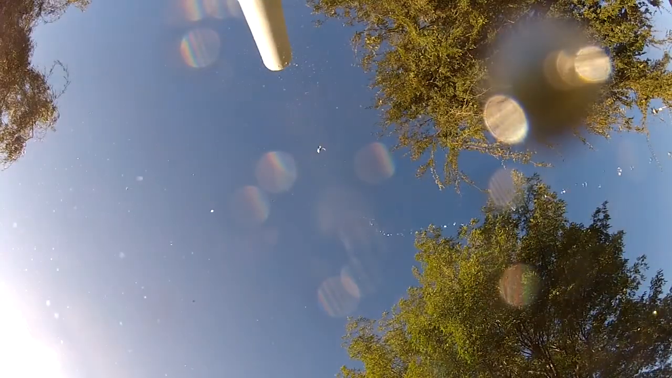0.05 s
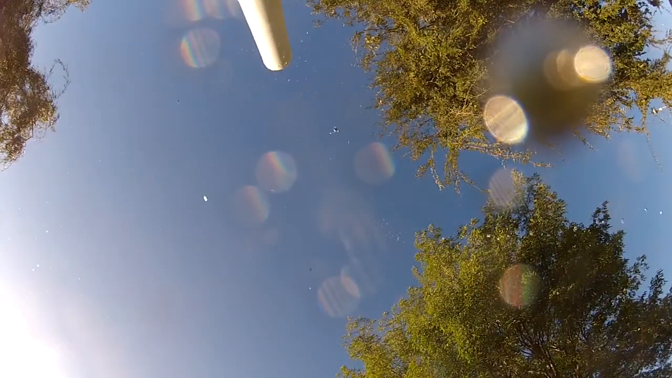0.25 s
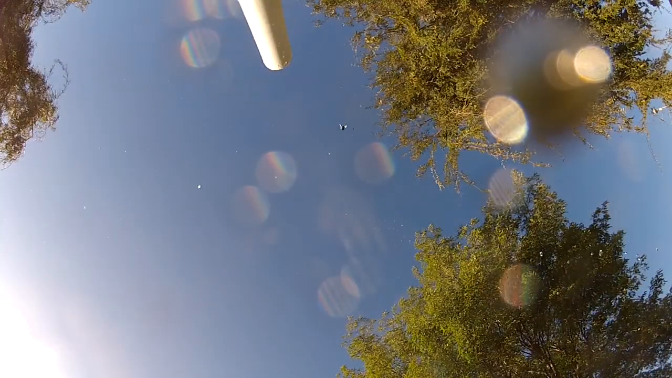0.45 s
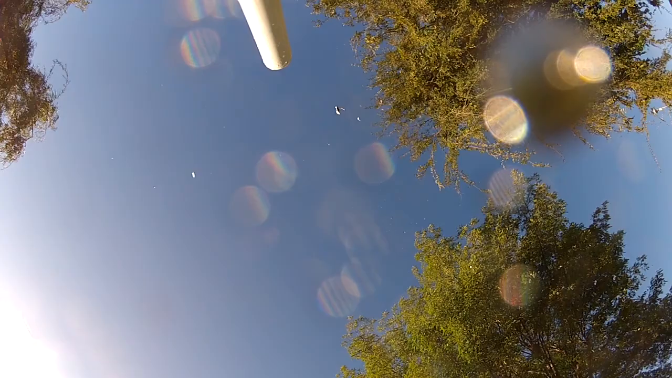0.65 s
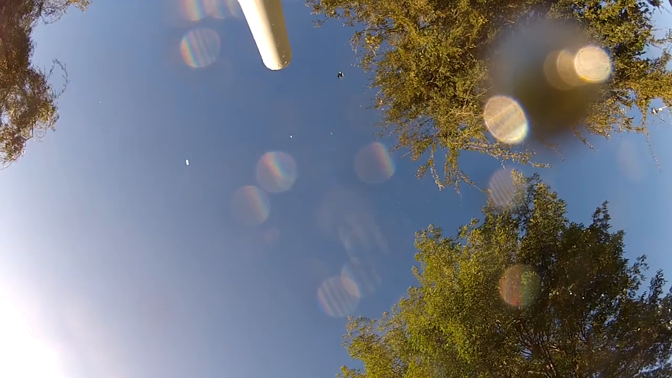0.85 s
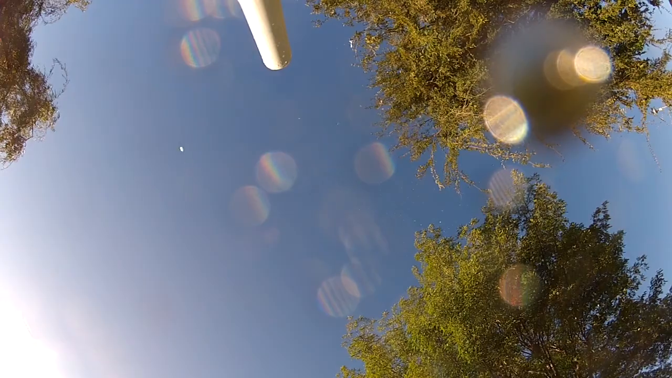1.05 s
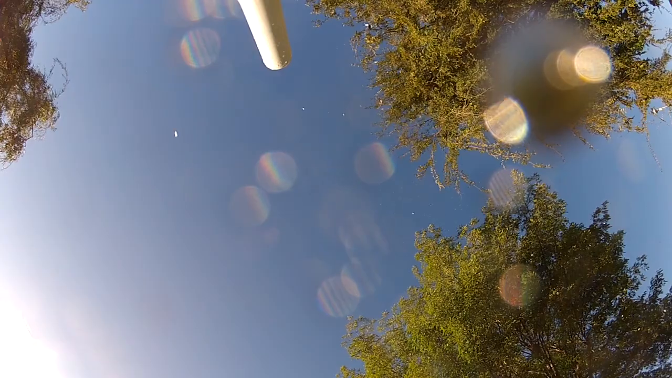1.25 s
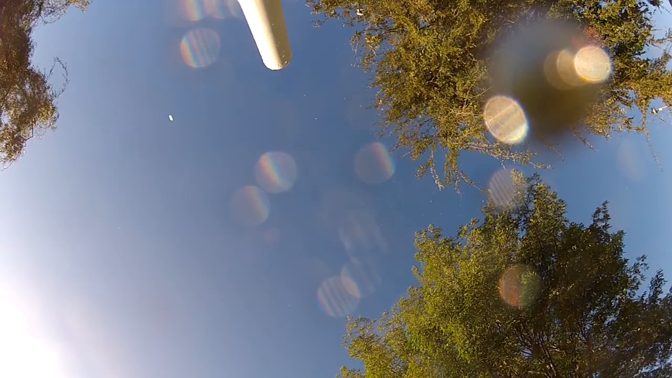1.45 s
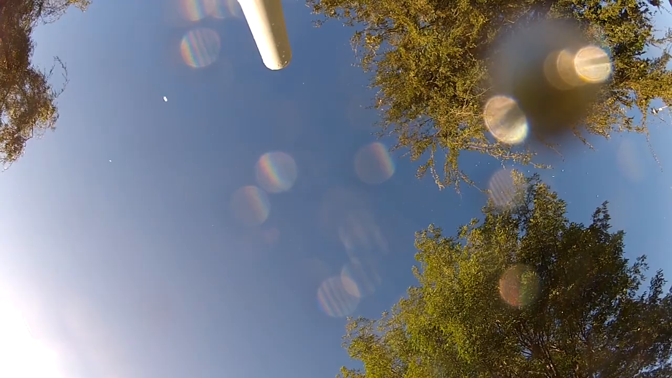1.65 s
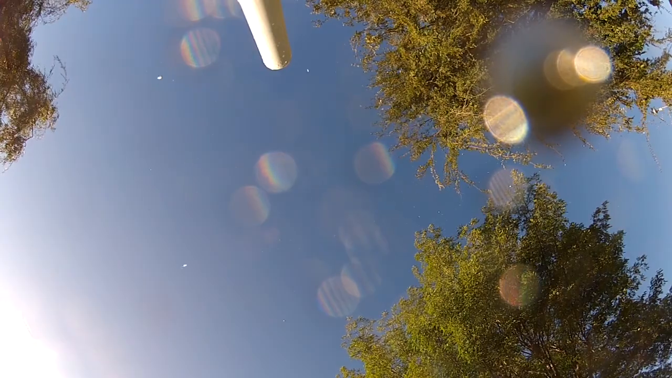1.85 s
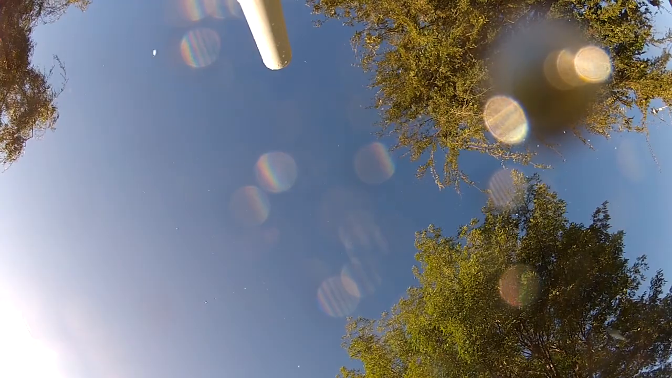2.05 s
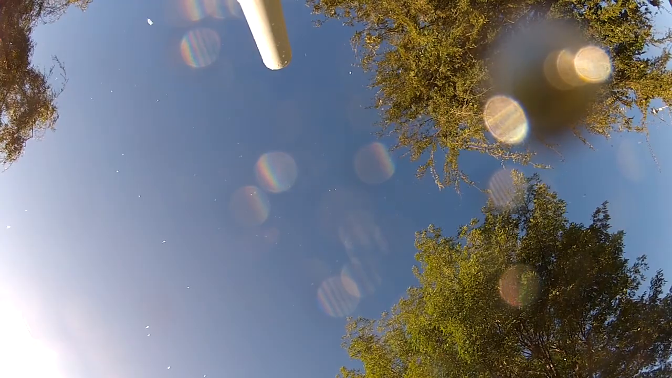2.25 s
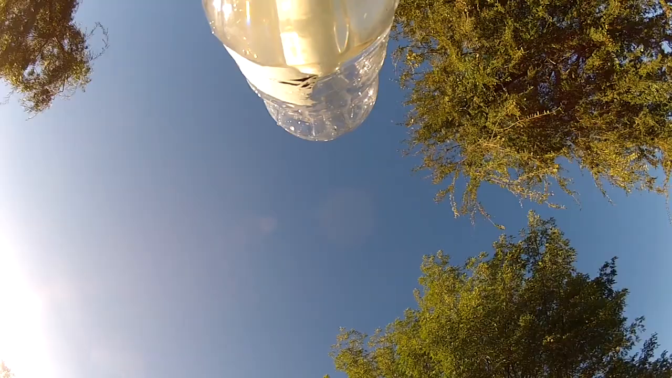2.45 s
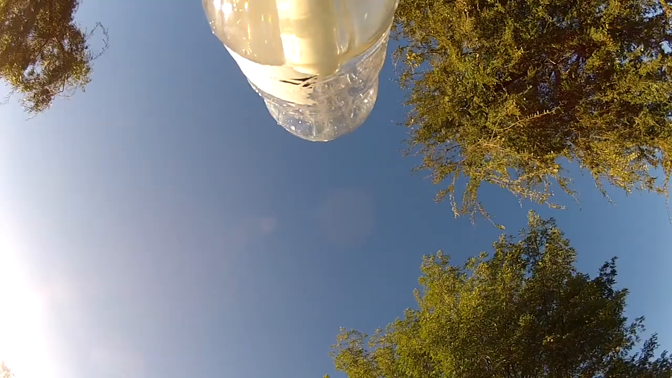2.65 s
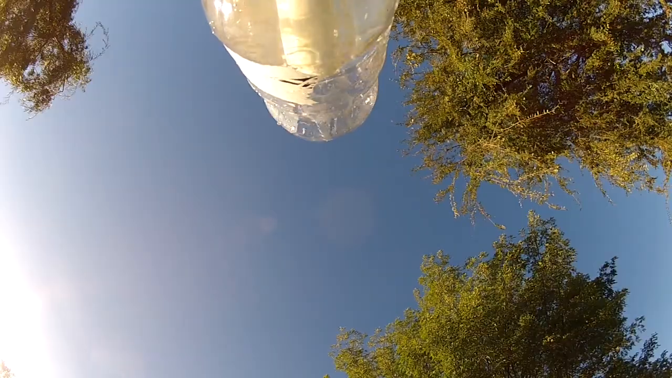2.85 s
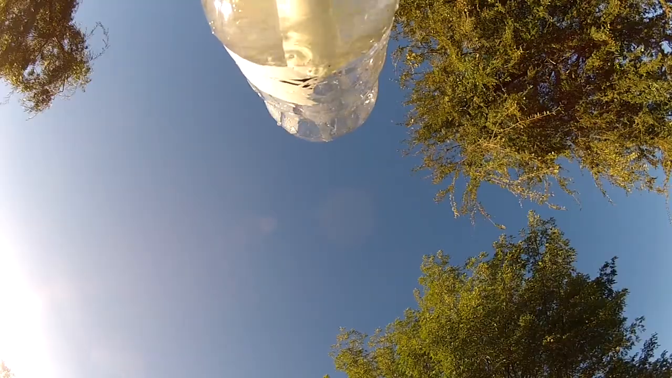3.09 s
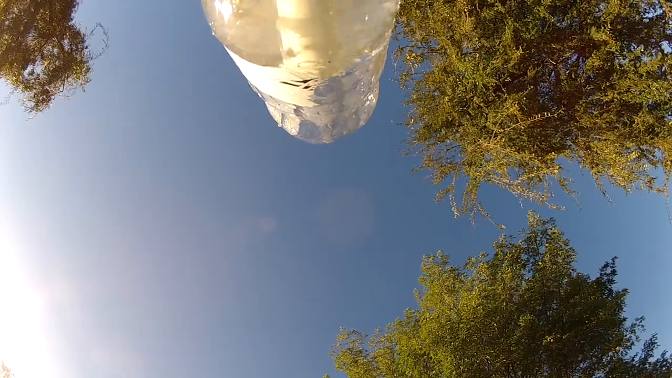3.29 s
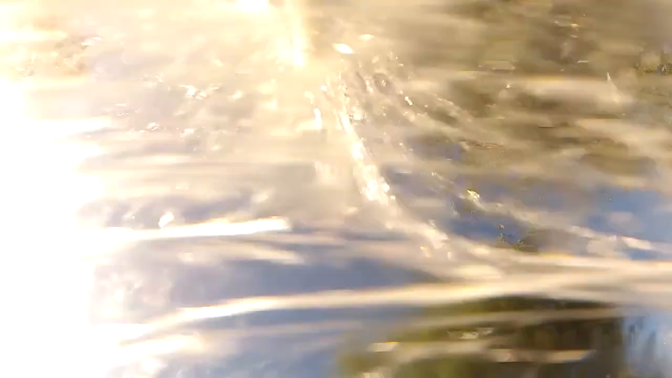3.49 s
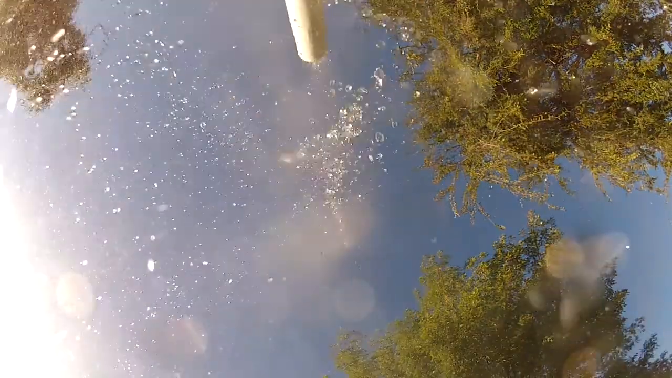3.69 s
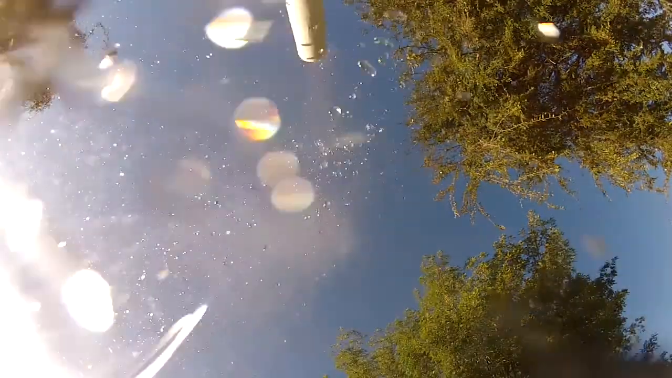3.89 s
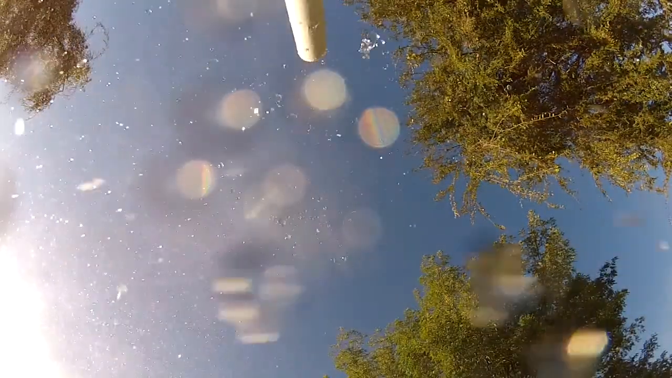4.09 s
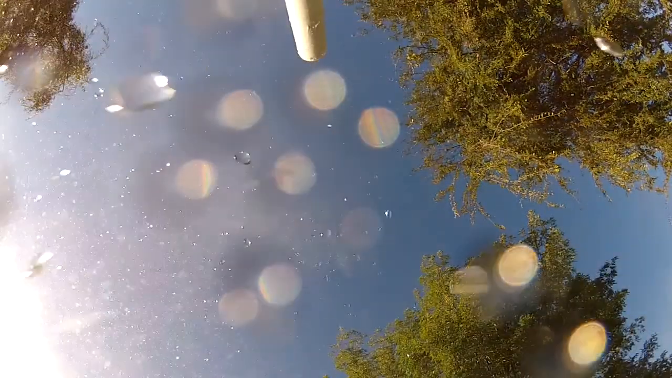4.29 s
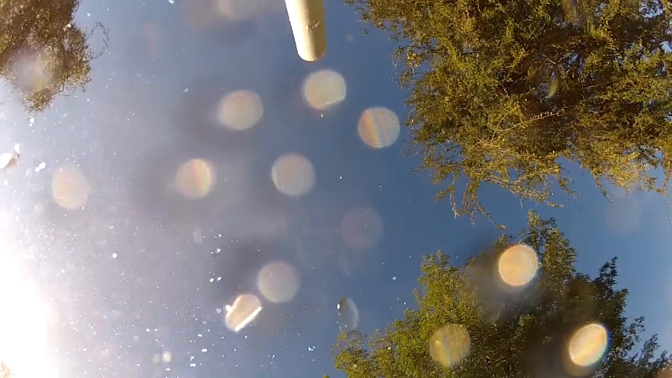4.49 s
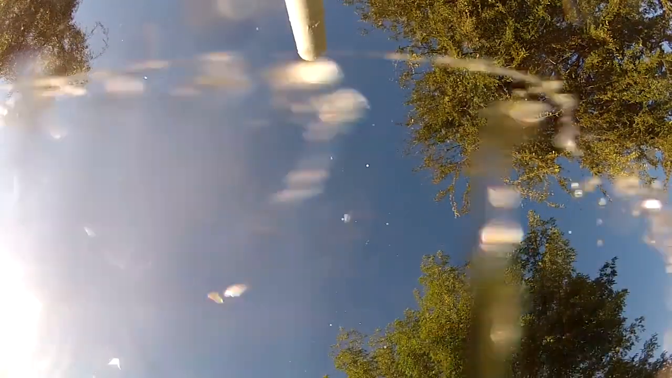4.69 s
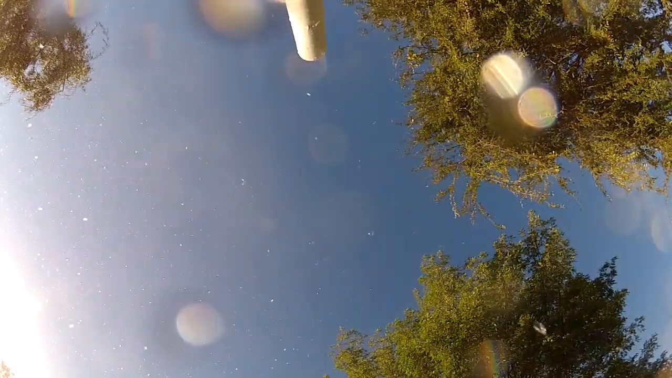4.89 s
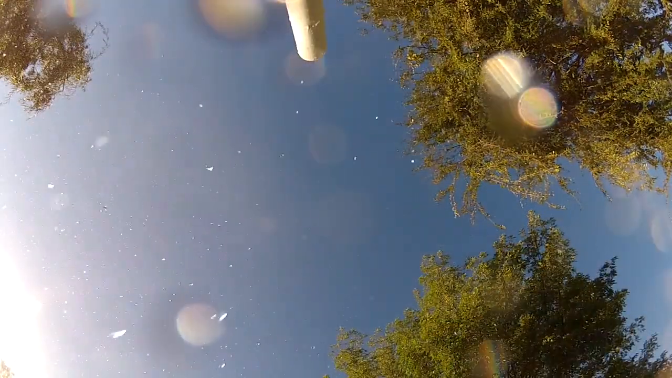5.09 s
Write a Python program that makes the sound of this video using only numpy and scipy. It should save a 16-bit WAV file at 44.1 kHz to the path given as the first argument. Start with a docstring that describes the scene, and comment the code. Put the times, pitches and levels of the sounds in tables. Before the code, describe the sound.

Outdoors, close to a small camera in a sealed housing: air hisses from a wet launch tube and dies away, leaving fine spray and tiny drips. A bottle fills with a faint whistling hiss and one plastic tick. Its water jet abruptly slaps the housing, the tube vents again, and scattered heavy drops thud and click on the case.

```python
"""Air rushes from a wet, empty launch tube while spray patters and water drips.
Then a bottle fills with a thin whistling hiss and lifts off as a water rocket. Its jet slaps a small action camera
in a closed housing beside the tube; the tube vents again and falling drops knock on the housing.
Noise rings the tube and the housing; short fading sines make the drips, spray and hollow plops.
The camera samples at 12 kHz and holds each sample, which mirrors the sound into a glassy treble."""
import sys
import numpy as np
from scipy import signal
from scipy.fft import rfft, irfft, next_fast_len
from scipy.io import wavfile
from scipy.ndimage import uniform_filter1d

SR = 44100
rng = np.random.default_rng(int(sys.argv[2]) if len(sys.argv) > 2 else 0)


def inscribe(sig):
    """Save sig as 16-bit PCM at rate SR to the path in sys.argv[1].

    A 1-D sig is mono; a 2-D sig holds one channel per row.
    Samples are clipped to [-1, 1] before scaling.
    """
    pcm = np.round(np.clip(np.atleast_2d(sig).T, -1, 1) * 32767)
    wavfile.write(sys.argv[1], SR, pcm.astype(np.int16))


N = 226409
TIME = np.arange(N) / SR
FFT_SIZE = next_fast_len(N, real=True)
FFT_HZ = np.fft.rfftfreq(FFT_SIZE, 1 / SR)

# outdoor background colour: pitch_hz, relative_db
OUTDOOR_COLOUR = [(15, -34.5), (25, -6.5), (141, 0.5), (250, -4.5), (385, -4), (555, -13), (958, -14.5),
                  (1290, -19), (3430, -23), (4940, -24.5), (5800, -30), (7540, -69), (12800, -120)]
OUTDOOR_DB, CHANNEL_NOISE_DB = -60.5, -81

# resonances of the wet open tube in each venting: pitch_hz, width_hz, relative_db
FIRST_TUBE_MODES = [(985, 340, -17.5), (1148, 184, -11.5), (1367, 32, -8), (1670, 54, -17.5),
                    (2007, 85, -9.5), (2324, 79, -3), (2510, 150, -10), (3004, 43, 1.5), (3198, 130, 2.5),
                    (3783, 110, 1), (4160, 27, -17.5), (4450, 85, 1.5), (5130, 280, -17.5), (5020, 250, -7),
                    (5230, 50, -16.5)]
SECOND_TUBE_MODES = [(664, 44, -18.5), (970, 135, -10.5), (1303, 40, -12), (2190, 150, -18), (2595, 64, -5),
                     (3074, 78, 1), (3245, 220, -7.5), (3910, 110, -22.5), (3790, 90, -9.5),
                     (4420, 147, -7), (4956, 130, -9.5), (5350, 28, -12.5)]
# colour of the broad roar of escaping air: pitch_hz, relative_db
FIRST_ROAR_COLOUR = [(100, -28), (300, -16.5), (900, -11), (1700, -16.5), (3200, 4.5), (4600, 0.5),
                     (5400, -16), (6000, -17)]
SECOND_ROAR_COLOUR = [(60, -4.5), (170, -0.5), (500, -7.5), (1000, -9), (1700, 0), (3200, -3), (4200, -38),
                      (5200, -4), (6000, -6.5)]
# air leaving the tube before and after the launch: start_s, attack_s, end_s, release_s, tube_level_db
FIRST_VENTING = (-.1, .1, .642, .335, -24.5)
SECOND_VENTING = (3.58, .225, 4.385, .345, -26.5)
FLOW_POWER = 1.8  # the sound's height grows as this power of the flow

# showers of fine spray settling on the ground: start_s, end_s, first_rate_per_s, thinning_s, base_level_db
SPRAY_SHOWERS = [(0, 2.56, 750, 2.6, -70.5), (3.6, 5.2, 3200, 1.6, -62)]
# the clearest drips around the launcher: start_s, peak_db, pitch_hz, t60_s
CLEAR_DRIPS = [(.6642, -49, 3450, .018), (.686, -40, 1990, .015), (.8127, -43, 3040, .0014),
               (.9629, -39, 2940, .0023), (1.0084, -39, 3030, .0011), (1.0479, -36, 2480, .011),
               (1.177, -45.5, 3100, .0018), (1.3551, -30.5, 3170, .0014), (1.381, -43, 1420, .0022),
               (1.4153, -39.5, 2350, .0022), (1.5918, -40.5, 3130, .0034), (1.632, -48, 3470, .006),
               (1.718, -48, 1280, .01), (1.76, -47, 3460, .022), (2.0204, -37.5, 2460, .0025),
               (2.068, -45, 2190, .0071), (2.3396, -48.5, 2650, .0044), (2.4081, -46, 3480, .008)]

# drops landing on the housing, short when square, long when smeared, after a few faint early splats on soft
# ground made the same way: start_s, contact_s, base_level_db, brightness_db_per_mode_group
WATER_DROPS = [ (2.045, .0074, -58, 1.5), (2.1775, .0086, -55.5, -1.5), (2.3665, .006, -54.5, -1),
               (2.4233, .0056, -43, -3.8), (3.915, .0034, -20, -3), (3.9243, .0011, -18.5, 4),
               (3.9469, .0022, -19, 2.3), (3.9549, .009, -31, 5), (4.057, .0057, -24, -.3),
               (4.0925, .0019, -29.5, -1), (4.1462, .004, -31, -1.5), (4.2632, .0051, -36.5, -2.8),
               (4.3381, .00065, -24.3, -.3), (4.368, .022, -28, -3.3), (4.4068, .002, -13, 1.7),
               (4.4416, .001, -17.5, 0), (4.4631, .0007, -19, -2.5), (4.4728, .0014, -11, -1),
               (4.4983, .0012, -37, -3.3), (4.577, .0073, -27, -1.5), (4.6021, .0011, -18, .2),
               (4.606, .01, -26.5, -5), (4.6509, .0021, -42, -2.6), (4.7185, .016, -23.3, -1.3),
               (4.7503, .0012, -10.7, 2), (4.8658, .0028, -49, -3), (4.9661, .0019, -47, -4),
               (4.995, .012, -40, -2.5), (5.0146, .0032, -40, -4), (5.0299, .0026, -11.7, -1)]
# sheets of the rocket's jet hitting the housing: start_s, contact_s, base_level_db, brightness_db_per_mode_group
JET_SHEETS = [(3.471, .022, -31, -2.5), (3.4951, .003, -25.5, 4), (3.5012, .0066, -17, 1.2),
              (3.5088, .0035, -5, -3.3), (3.516, .015, -35.5, 3.5), (3.5301, .0085, -9, 1.8),
              (3.541, .011, -32.5, -2.8), (3.557, .026, -33.5, 2.5), (3.5685, .0058, -26, 0)]
# how strongly water rings each group of modes: shell_db, walls_db, window_db, film_db
DROP_GROUP_BALANCE = (-7.7, .5, -1, -4)
JET_GROUP_BALANCE = (-6.7, -2, -3, -1.3)
# modes of the whole housing shell: pitch_hz, width_hz, relative_db
SHELL_MODES = [(110, 216, -2), (292, 191, -1)]
# modes of the housing walls: pitch_hz, width_hz, relative_db
WALL_MODES = [(400, 142, -8.5), (679, 360, -10), (993, 146, -0.5)]
# modes of the lens window: pitch_hz, width_hz, relative_db
WINDOW_MODES = [(1577, 660, -2), (2244, 330, 5.5)]
# modes of the water film on the window: pitch_hz, width_hz, relative_db
FILM_MODES = [(3070, 296, -2.5), (3644, 310, 0.5), (4440, 370, -7), (5350, 590, -13)]
# the longer water presses, the more it moves the shell: dB for each doubling of the usual contact time
PRESS_DB, USUAL_CONTACT_S = 2.6, .003
PRESSURE_BUILD_SHARE = .06  # part of the contact time over which pressure builds
SPATTER_PER_S, SPATTER_FADE_S = 500, .016
# the camera sways on its mount after each thump
ROCKING_HZ, ROCKING_T60_S, JET_ROCKING_DB, DROP_ROCKING_DB = 33.5, .95, -46, -23

# resonances of the tube capped by the bottle: pitch_hz, width_hz, relative_db
CAPPED_TUBE_MODES = [(3234, 130, -4), (3550, 120, -13.5), (3900, 66, -12.5), (4600, 91, -7.5),
                     (4494, 110, 0.5), (4610, 310, -1), (5060, 82, -12), (5210, 240, -3)]
# whistles of the air inlet: pitch_hz, width_hz, relative_db
INLET_TONES = [(1025, 12, -8), (2183, 24, -1.5)]
# whistles of the tube at full pressure: pitch_hz, width_hz, relative_db
TUBE_TONES = [(3130, 42, -4.5), (4575, 55, -6.5)]
# rise and fade of the three filling sounds: opening_db, peak_s, peak_db, fade_db_per_s
HISS_RISE_AND_FADE = (-66, 2.72, -41.3, 37)
INLET_RISE_AND_FADE = (-58, 2.75, -50.5, 45)
TUBE_RISE_AND_FADE = (-61, 2.88, -49.3, 12.5)
# the valve is open from the start of filling until lift-off
FILL_START_S, LIFTOFF_S, VALVE_S = 2.57, 3.49, .006
# one plastic tick as the bottle swells: start_s, base_level_db
BOTTLE_TICK = (2.7063, -29)
# ringing modes of the bottle: pitch_hz, relative_db, t60_s
BOTTLE_MODES = [(770, -11, 0.011), (1027, -3.5, 0.023), (1650, -3, 0.027), (2630, -5.5, 0.011),
                (3120, 3, 0.02), (3560, -1.5, .012), (4500, 1.5, 0.013)]

# hollow notes of the fattest drops: start_s, peak_db, pitch_hz, t60_s
HOLLOW_PLOPS = [(4.264, -31, 400, 0.042), (4.474, -13, 625, 0.047), (4.473, -29, 138, 0.13),
                (4.582, -22.5, 137.8, 0.14), (4.606, -20, 620, .05)]

OVERLOAD = .95  # the camera clips at this height
CUTOFF_HZ = 15400


def from_db(db):
    """Turn decibels into a multiplying factor."""
    return 10 ** (np.asarray(db) / 20)


def rms_one(x):
    """Scale a sound to an average strength (rms) of 1."""
    return x / np.sqrt(np.mean(np.abs(x) ** 2) + 1e-30)


def add(out, start_s, sound):
    """Mix a short sound in at its start time."""
    at = round(start_s * SR)
    out[at:at + len(sound)] += sound[:N - at]


def shaped_noise(gain):
    """White noise with a gain at each frequency, rms 1."""
    white = rfft(rng.standard_normal(FFT_SIZE))
    return rms_one(irfft(white * gain, FFT_SIZE)[:N])


def drift(hz):
    """Random wandering, mostly slower than the given frequency, with a spread of 1."""
    return shaped_noise(1 / (1 + (FFT_HZ / hz) ** 2))


def noise(colour):
    """Noise of the given colour, rms 1."""
    hz, db = np.transpose(colour)
    gain_db = np.interp(np.log(FFT_HZ + 1), np.log(hz), db)
    return shaped_noise(from_db(gain_db))


def resonate(x, modes):
    """Let a sound ring side-by-side resonances of alternating sign."""
    out = 0
    for k, (hz, width_hz, db) in enumerate(modes):
        radius = np.exp(-np.pi * width_hz / SR)  # closer to 1 rings longer
        feed = np.array([1, 0, -1]) * (1 - radius ** 2) / 2
        feedback = [1, -2 * radius * np.cos(2 * np.pi * hz / SR), radius ** 2]
        ringing = signal.lfilter(feed, feedback, x + 1e-18)
        out = out + (-1) ** k * from_db(db) * ringing
    return out


def ping(hz, t60_s):
    """A sine that swells over about half a cycle and dies away; its outline peaks at 1."""
    t = TIME[:int(t60_s * SR) + 8]
    outline = (1 - np.exp(-2 * hz * t)) * from_db(-60 * t / t60_s)
    return np.sin(2 * np.pi * hz * t) * outline / outline.max()


def outdoor_air():
    """Steady coloured noise makes the quiet outdoor background."""
    return from_db(OUTDOOR_DB) * noise(OUTDOOR_COLOUR)


def tube_hiss(modes, flicker_db):
    """Turbulence drives each tube resonance on its own, in uneven puffs."""
    out = 0
    for hz, width_hz, db in modes:
        # two passes keep the valleys dark; widening each leaves the stated width
        mode = [(hz, width_hz / np.sqrt(np.sqrt(2) - 1), 0)]
        ringing = resonate(resonate(rng.standard_normal(N), mode), mode)
        out = out + from_db(db + flicker_db * drift(9)) * ringing
    return rms_one(out)


def gust_db(gust):
    """The flow rises, holds and runs out; give the resulting level in dB."""
    start_s, attack_s, end_s, release_s, level_db = gust
    flow = np.minimum((TIME - start_s) / attack_s, (end_s - TIME) / release_s)
    flow = np.clip(flow, 1e-3, 1)
    return level_db + FLOW_POWER * 20 * np.log10(flow)


def venting(gust, modes, roar, roar_db, roar_growth, sputter_db, flicker_db):
    """Air rings the tube; strong flow adds a broad roar, and water in the tube makes it sputter."""
    level_db = gust_db(gust)
    roar_gain = from_db(roar_db + roar_growth * (level_db - level_db.max()))
    sputter = from_db(level_db + sputter_db * drift(60))
    return sputter * (tube_hiss(modes, flicker_db) + roar_gain * noise(roar))


def spray(share, gain_db, cycles, low_hz, high_hz, size_spread_db=2.0, count=12):
    """A share of each thinning shower lands at random; droplets of random size ring at one of several pitches."""
    size_db = gain_db + size_spread_db * np.minimum(rng.exponential(1, N), 3)
    sizes = from_db(size_db) * rng.choice([-1, 1], N)
    chance, landings = rng.random(N), np.zeros(N)
    for start_s, end_s, per_s, thinning_s, db in SPRAY_SHOWERS:
        falling = (TIME >= start_s) * (TIME < end_s)
        rate = per_s * np.exp((start_s - TIME) / thinning_s) * falling
        landings += from_db(db) * sizes * (chance < share * rate / SR)
    pitch_number = rng.integers(0, count, N)
    out = np.zeros(N)
    for k, hz in enumerate(np.geomspace(low_hz, high_hz, count)):
        # the given number of cycles takes each note down by 60 dB
        out += np.convolve(landings * (pitch_number == k), ping(hz, cycles / hz))[:N]
    return out


def drips(tick_db=-15, tick_s=0.0045):
    """Each drip is a brief bubble note with a faint splashy tick of noise."""
    out, t = np.zeros(N), TIME[:SR // 100]
    for start_s, db, hz, t60_s in CLEAR_DRIPS:
        add(out, start_s, from_db(db) * ping(hz, t60_s))
        tick = rng.standard_normal(len(t)) * np.exp(-t / tick_s)
        add(out, start_s, from_db(db + tick_db) * tick)
    return out


def group_levels(contact_s, level_db, bright_db, balance):
    """Bright blows favour high mode groups, dull ones low; long contact moves the shell more. Give dB."""
    levels = level_db + np.array(balance) + bright_db * (np.arange(4) - 3 / 2)
    levels[0] += PRESS_DB * np.log2(contact_s / USUAL_CONTACT_S)
    return levels


def struck(force, modes):
    """Every blow shares its energy among the modes of a group in the same proportions."""
    out = 0
    for k, (hz, width_hz, db) in enumerate(modes):
        ringing = rms_one(resonate(force, [(hz, width_hz, 0)]))
        out = out + (-1) ** k * from_db(db) * np.sqrt(width_hz) * ringing
    return out


def water_blows(blows, balance, push, spread_s, splash_db, splash_s, spatter_db):
    """Water presses, splashes and throws off droplets that fall back; the force rings four mode groups."""
    out, t = np.zeros(N), TIME[:SR // 12]
    level_window = .005 * SR  # set levels as if each blow's energy filled 5 ms
    chance = SPATTER_PER_S / SR
    groups = (SHELL_MODES, WALL_MODES, WINDOW_MODES, FILM_MODES)
    for start_s, contact_s, level_db, bright_db in blows:
        after = np.maximum(t - contact_s, 0)
        build = 1 - np.exp(-t / (PRESSURE_BUILD_SHARE * contact_s))
        contact = build * np.exp(-after / spread_s)
        splash = from_db(splash_db) * np.exp(-after / splash_s)
        droplets = (rng.random(len(t)) < chance) * rng.standard_normal(len(t)) / np.sqrt(chance)
        spatter = from_db(spatter_db) * np.exp(-after / SPATTER_FADE_S) * droplets
        levels = group_levels(contact_s, level_db, bright_db, balance)
        for modes, db in zip(groups, levels):
            rough = (contact + splash) * rng.standard_normal(len(t))
            sound = struck(push * contact + rough + spatter, modes)
            to_level = np.sqrt(level_window / np.sum(sound ** 2))
            add(out, start_s, from_db(db) * sound * to_level)
    return out


def rocking(blows, balance, gain_db):
    """Each thump feeds the camera's slow sway, which dies away and reaches the microphone as a deep hum."""
    energy, dying = np.zeros(N), from_db(-60 * TIME / ROCKING_T60_S)
    for start_s, contact_s, level_db, bright_db in blows:
        thump_db = group_levels(contact_s, level_db, bright_db, balance)[0]
        add(energy, start_s, (from_db(thump_db + gain_db) * dying) ** 2)
    swing = np.sqrt(np.abs(uniform_filter1d(energy, size=SR // 50)))  # smoothed over 20 ms
    hum = np.sin(2 * np.pi * ROCKING_HZ * TIME + .5 * drift(4))
    return swing * rms_one(hum)


def fill_gain(rise_and_fade):
    """While the valve is open, the sound swells to a peak and then fades steadily as the bottle fills."""
    opening_db, peak_s, peak_db, fade_db_per_s = rise_and_fade
    valve = np.clip(np.minimum(TIME - FILL_START_S, LIFTOFF_S - TIME) / VALVE_S, 0, 1)
    swell_db = np.interp(TIME, [FILL_START_S, peak_s], [opening_db, peak_db])
    fade_db = fade_db_per_s * np.maximum(TIME - peak_s, 0)
    return valve * from_db(swell_db - fade_db)


def whistles(tones, pitch):
    """Unsteady tones, each wandering in strength and phase within its width."""
    turns = 2 * np.pi * np.cumsum(pitch) / SR
    out = 0
    for hz, width_hz, db in tones:
        wandering = drift(width_hz) * np.cos(hz * turns) + drift(width_hz) * np.sin(hz * turns)
        out = out + from_db(db) * wandering
    return out


def filling(flutter_db=1.8, start_jitter=.09, start_flat=.055, settle_s=.17):
    """Air squeezes into the bottle: hiss dies down and leaves thin whistles that rise with the pressure."""
    # the whistles are flat and breathy until the flow has settled
    unsettled = np.exp(-np.maximum(TIME - FILL_START_S, 0) / settle_s)
    pitch = 1 - start_flat * unsettled + start_jitter * unsettled ** 2 * drift(200)
    puffs = tube_hiss(CAPPED_TUBE_MODES, flicker_db=3)
    band = signal.butter(6, [2850, 5400], "band", fs=SR, output="sos")
    hiss = rms_one(signal.sosfilt(band, puffs))
    out = fill_gain(HISS_RISE_AND_FADE) * from_db(flutter_db * drift(25)) * hiss
    out += fill_gain(INLET_RISE_AND_FADE) * whistles(INLET_TONES, pitch)
    out += fill_gain(TUBE_RISE_AND_FADE) * whistles(TUBE_TONES, pitch)
    return out


def bottle_tick():
    """The plastic ticks once as the bottle swells, ringing all its modes together."""
    out = np.zeros(N)
    start_s, tick_db = BOTTLE_TICK
    for k, (hz, db, t60_s) in enumerate(BOTTLE_MODES):
        add(out, start_s, (-1) ** k * from_db(tick_db + db) * ping(hz, t60_s))
    return out


def plops():
    """Fat drops leave short hollow notes, each a fading sine."""
    out = np.zeros(N)
    for start_s, db, hz, t60_s in HOLLOW_PLOPS:
        add(out, start_s, from_db(db) * ping(hz, t60_s))
    return out


def scene():
    """Everything reaches both channels alike, apart from a trace of noise in each."""
    mono = outdoor_air()
    mono += venting(FIRST_VENTING, FIRST_TUBE_MODES, FIRST_ROAR_COLOUR,
                    roar_db=-6, roar_growth=0.5, sputter_db=0.86, flicker_db=1.3)
    # fine mist, then fewer and sharper ticks
    mono += spray(share=0.91, gain_db=0, cycles=20.0, low_hz=900, high_hz=5400, size_spread_db=2.5)
    mono += spray(share=.045, gain_db=16.3, cycles=4.0, low_hz=2000, high_hz=5200, size_spread_db=2.8)
    mono += drips()
    mono += water_blows(WATER_DROPS, DROP_GROUP_BALANCE, push=0.18, spread_s=.0007,
                        splash_db=-25.5, splash_s=0.0045, spatter_db=-37)
    mono += rocking(WATER_DROPS, DROP_GROUP_BALANCE, DROP_ROCKING_DB)
    mono += filling() + bottle_tick()
    mono += water_blows(JET_SHEETS, JET_GROUP_BALANCE, push=0.06, spread_s=.0012,
                        splash_db=-30, splash_s=.003, spatter_db=-32)
    mono += rocking(JET_SHEETS, JET_GROUP_BALANCE, JET_ROCKING_DB)
    mono += venting(SECOND_VENTING, SECOND_TUBE_MODES, SECOND_ROAR_COLOUR,
                    roar_db=-5.5, roar_growth=0.087, sputter_db=1.1, flicker_db=1.1)
    mono += plops()
    channel_noise = np.array([noise(OUTDOOR_COLOUR), noise(OUTDOOR_COLOUR)])
    return mono + from_db(CHANNEL_NOISE_DB) * channel_noise


def record(dry):
    """Sample at 12 kHz and clip; holding each sample mirrors the spectrum around 6 and 12 kHz."""
    coarse = signal.resample_poly(dry, 40, 147, axis=1)  # 44.1 to 12 kHz
    coarse = np.clip(coarse, -OVERLOAD, OVERLOAD)
    steps = np.repeat(coarse, 4, axis=1)  # each sample held, now at 48 kHz
    held = signal.resample_poly(steps, 147, 160, axis=1)[:, :N]  # back to 44.1 kHz
    lowpass = signal.ellip(10, .2, 80, CUTOFF_HZ, fs=SR, output="sos")
    return signal.sosfilt(lowpass, held)


dry = scene()
out = record(dry)
inscribe(out)
```